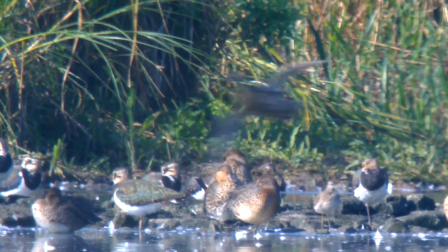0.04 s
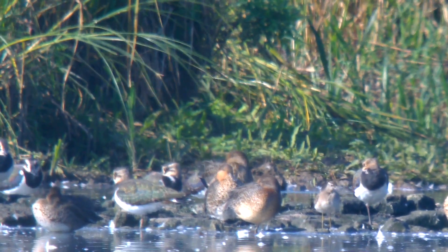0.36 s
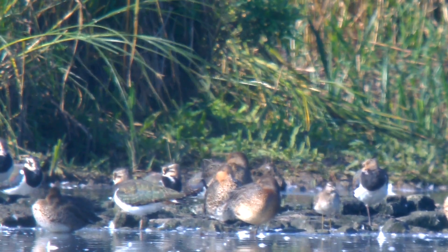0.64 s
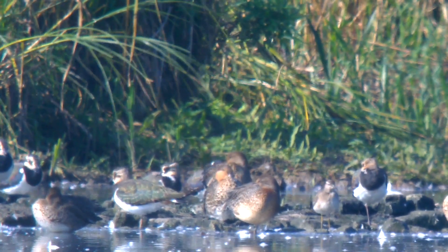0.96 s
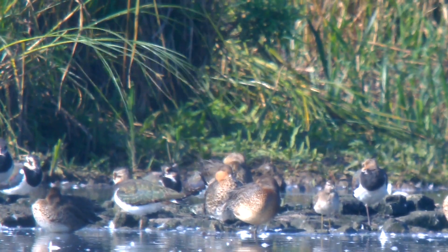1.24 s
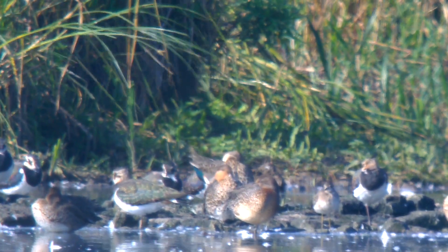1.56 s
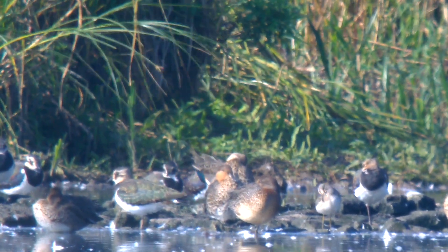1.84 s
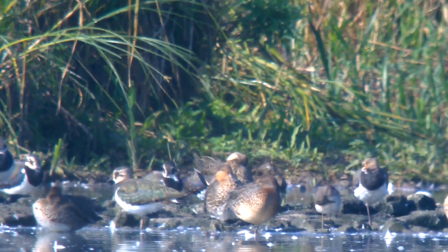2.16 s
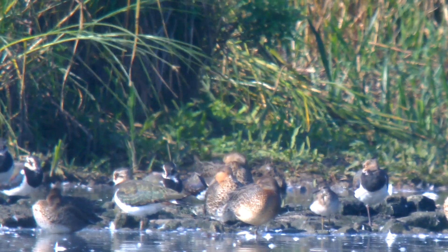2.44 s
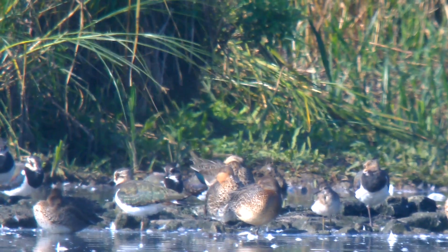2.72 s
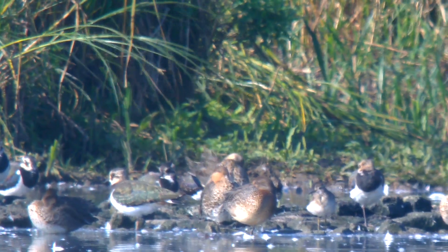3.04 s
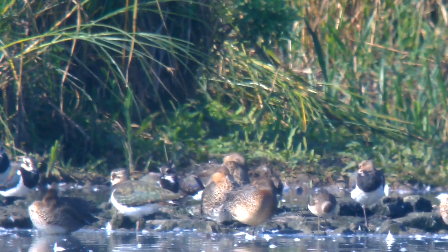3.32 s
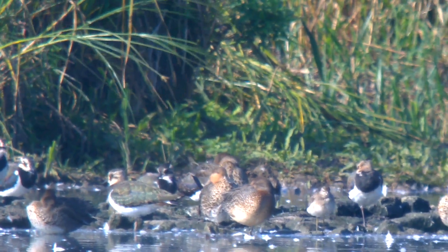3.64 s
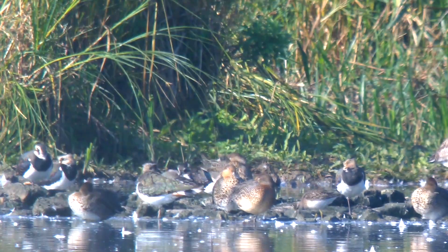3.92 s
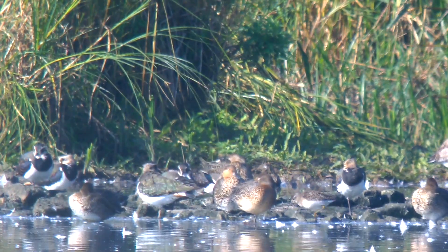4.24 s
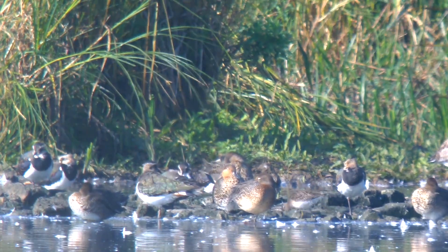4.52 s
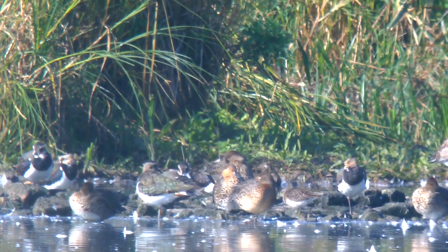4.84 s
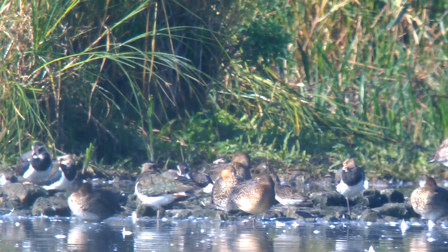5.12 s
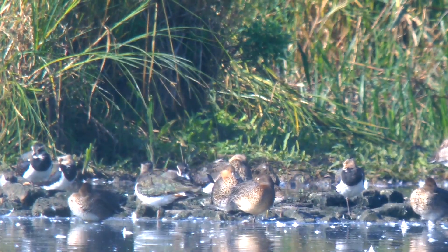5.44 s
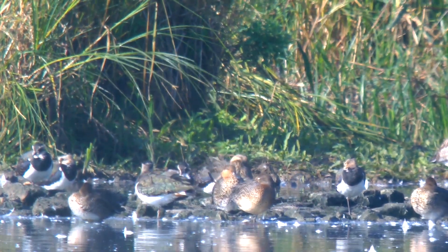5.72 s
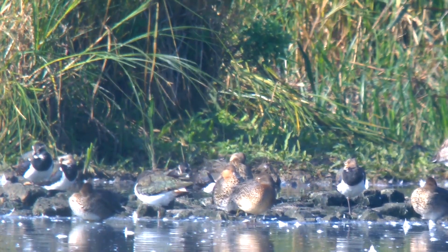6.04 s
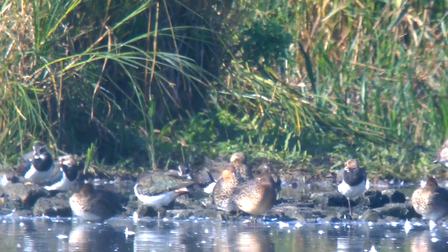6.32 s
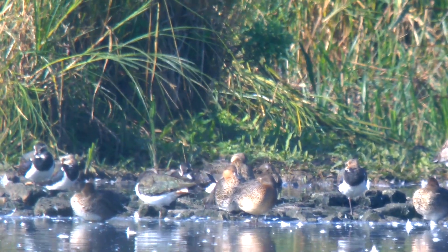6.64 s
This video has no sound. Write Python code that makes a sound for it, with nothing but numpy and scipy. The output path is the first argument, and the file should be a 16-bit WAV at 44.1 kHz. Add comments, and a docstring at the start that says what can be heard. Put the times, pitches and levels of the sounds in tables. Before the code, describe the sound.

Wind thumps on the microphone over a low rumble and softly hissing marsh reeds, with faint distant bird chirps later.

```python
"""Wind at the edge of a marsh

Reeds hiss over a far low rumble and a steady wash of distant wind, with faint hoots.
Gusts thump the microphone, mostly on its left side, while the camera whines and hums faintly.
About halfway a splice clicks; then the hiss drops, the whine throbs and a far small bird chirps."""
import sys
import numpy as np
from scipy import signal
from scipy.fft import rfft, irfft, next_fast_len
from scipy.io import wavfile
from scipy.ndimage import uniform_filter1d, map_coordinates

SR = 44100
rng = np.random.default_rng(int(sys.argv[2]) if len(sys.argv) > 2 else 0)


def persist_wave(psi):
    """Save psi, clipped to +-1, as 16-bit WAV."""
    counts = np.round(np.clip(psi, -1, 1) * 32767).astype(np.int16)
    wavfile.write(sys.argv[1], SR, np.atleast_2d(counts).T)


N = 302967


def amp(db):
    """Turn decibels into a number to multiply by."""
    return 10 ** (np.asarray(db) / 20)


def unit(x):
    """Scale a sound so that its average strength (rms) is 1."""
    return x / np.sqrt(np.mean(x ** 2) + 1e-30)


def clock():
    """The time of every sample, in seconds."""
    return np.arange(N) / SR


def along(points, hz, column=1):
    """Read a table at any frequency, sliding between its rows."""
    cols = np.transpose(points)
    return np.interp(np.log(hz + 1), np.log(cols[0] + 1), cols[column])


def curve(rows):
    """Join (seconds, value) rows with straight lines."""
    return np.interp(clock(), *np.transpose(rows))


def swells(rows, half_s):
    """A level that rises and falls briefly at each (seconds, dB) row."""
    return sum(amp(db) * np.exp(-((clock() - s) / half_s) ** 2) for s, db in rows)


def wobble(rate):
    """A smooth curve through `rate` random values a second."""
    return map_coordinates(rng.standard_normal(int(N * rate / SR) + 4), [clock() * rate])


def filtered(x, response):
    """Turn each frequency up or down by the gain response(hz)."""
    size = next_fast_len(N + SR // 2)
    return irfft(rfft(x, size) * response(np.fft.rfftfreq(size, 1 / SR)), size)[..., :N]


def narrow(x, centre_hz, width_hz):
    """Keep one narrow band, which turns noise into a wavering tone."""
    return unit(filtered(x, lambda hz: 1 / (1 + (2 * (hz - centre_hz) / width_hz) ** 2)))


def noise(colour):
    """Noise whose mix of low and high follows (Hz, dB) rows."""
    return unit(filtered(rng.standard_normal(N), lambda hz: amp(along(colour, hz))))


def evened(x, span_s):
    """Flatten the chance swells of a noise."""
    power = uniform_filter1d(np.abs(signal.hilbert(x)) ** 2, max(int(span_s * SR), 1))
    return unit(x / np.sqrt(np.abs(power) + 1e-6))


def patchy_pair(alike, patchy_db):
    """Stereo noise with drifting loud and soft patches; `alike` sets how well the sides match."""
    spectrum = signal.stft(rng.standard_normal((2, N)), nperseg=512)[2]
    patches = uniform_filter1d(rng.standard_normal(spectrum.shape[1:]), size=5, axis=0)
    patches = uniform_filter1d(patches, size=18, axis=1)
    pair = signal.istft(spectrum * amp(patchy_db * unit(patches)), nperseg=512)[1][:, :N]
    turn = lambda hz: np.arccos(np.clip(along(alike, hz), -1, 1)) / 2
    shared, opposed = filtered(pair, lambda hz: np.array([np.cos(turn(hz)), np.sin(turn(hz))]))
    return np.array([shared + opposed, shared - opposed])


# How the rumble rises and falls. Each row: time in seconds, relative level in dB.
RUMBLE_LEVELS = [(.06, -42), (.25, -52), (.35, -43.5), (.47, -43.5), (.56, -42.5), (.75, -48.5),
                 (.82, -43.5), (.86, -54.5), (.91, -47), (.99, -44.5), (1.04, -49.5), (1.15, -39.5),
                 (1.28, -51.5), (1.36, -44), (1.6, -47), (2.0, -43.5), (2.3, -43), (3.7, -49), (3.82, -50),
                 (4.85, -45), (5.0, -47), (5.08, -44.5), (5.55, -44), (5.68, -46.5), (6.08, -45.5),
                 (6.17, -51.5), (6.25, -47), (6.6, -50), (6.87, -47)]
# The rumble's tone. Each row: frequency in Hz, relative strength in dB.
RUMBLE_COLOUR = [(10, -28), (20, -13), (31, 2.5), (42, -4.5), (58, -.5), (76, -11.5), (95, -11.5),
                 (115, -20), (160, -23.5), (240, -35.5), (500, -61), (1500, -100)]

def rumble():
    """A far low rumble flutters, in step on both sides and stronger on the left."""
    db = curve(RUMBLE_LEVELS) + 1.5 * wobble(rate=11)
    return amp(db) * evened(noise(RUMBLE_COLOUR), span_s=0.093) * amp([[5.3], [-.5]])


def drone():
    """A low far drone grows steadily, heard only at the very end."""
    rise_db_per_s = 18
    db = -54.5 - rise_db_per_s * (N / SR - clock())
    tone = narrow(rng.standard_normal(N), centre_hz=129, width_hz=80)
    return amp(db) * tone * amp([[2.5], [-3]])


# How loud the distant wind is. Each row: time in seconds, relative level in dB.
WASH_LEVELS = [(0, -60.5), (.8, -60), (.86, -60.5), (.95, -59), (1.25, -58.5), (1.45, -58), (1.62, -58.5),
               (1.9, -60.5), (2.3, -59), (3.15, -60.5), (3.4, -59.5), (3.7, -60.3), (3.82, -62.5),
               (4.45, -60.5), (4.75, -61.5), (4.87, -61), (5.1, -60), (5.6, -61.5), (5.82, -60.5),
               (6.3, -61.5), (6.58, -59.5), (6.87, -61.5)]
# Its tone. Each row: frequency in Hz, relative strength on the left and on the right in dB.
WASH_COLOUR = [(131, 7, 2.5), (220, 0, -7.5), (378, -1.5, -7.5), (538, -2.5, -11.5), (844, -1.5, -8),
               (1100, -4.5, -9), (1196, -5.5, -14), (1493, -15.5, -20), (1850, -16, -27.5),
               (2060, -16, -26), (2150, -11, -28), (2400, -11, -28.5), (2860, -19, -37), (3140, -17, -41),
               (3890, -26.5, -55), (6000, -35.5, -41), (10200, -43.5, -53)]
# How its two sides match. Each row: frequency in Hz, likeness from 1 (same) to -1 (opposite).
WASH_ALIKE = [(200, 0.92), (350, 0.93), (520, 0.24), (760, 0.41), (880, -0.35), (1080, -0.62),
              (1400, -0.075), (1900, -0.19), (3200, 0.087), (6000, -0.0043)]

def wash():
    """Distant wind over open ground blends into a murmur."""
    sides = lambda hz: amp([along(WASH_COLOUR, hz, column=1), along(WASH_COLOUR, hz, column=2)])
    low_cut = lambda hz: hz ** 2 / (hz ** 2 + 90 ** 2)
    air = filtered(patchy_pair(WASH_ALIKE, patchy_db=1.13), lambda hz: sides(hz) * low_cut(hz))
    return amp(curve(WASH_LEVELS) + 6.0) * unit(air)


# Thin hums. Each row: start in seconds, pitch in Hz, width in Hz, left level in dB,
# right level in dB, likeness of the two sides.
HUMS = [(-0.5, 895, 20, -73, -71, -0.67), (-1, 389, 14, -71, -81, 0.99), (3, 334, 18, -65.5, -77.5, 0.48),
        (0, 6660, 400, -91, -89, 0.047)]

def hums():
    """Faint steady hums waver; the one near 895 Hz comes from the camera."""
    out = np.zeros((2, N))
    for start, centre_hz, width_hz, left_db, right_db, alike in HUMS:
        tone = narrow(patchy_pair([(1000, alike)], patchy_db=-3.5), centre_hz, width_hz)
        out += tone * amp([[left_db], [right_db]]) * (clock() >= start)
    return out


# Short hoots. Each row: time of the peak in seconds, level on the right in dB.
HOOTS = [(.35, -66), (.99, -63), (1.75, -57), (2.82, -66), (3.37, -66), (5.08, -55), (5.35, -65),
         (5.84, -58), (6.64, -64)]

def hoots():
    """One faint tone swells into brief hoots, the two sides moving against each other."""
    tone = evened(narrow(rng.standard_normal(N), centre_hz=897, width_hz=27), span_s=0.045)
    return swells(HOOTS, half_s=0.039) * tone * np.array([[-amp(-7)], [1]])


# How loud the reeds are. Each row: time in seconds, relative level in dB.
REED_LEVELS = [(0.0, -76), (1.22, -76), (2.6, -73.5), (3.52, -73.5), (3.92, -77), (5.85, -77.5),
               (6.87, -77)]
# Their tone. Each row: frequency in Hz, relative strength in dB.
REED_COLOUR = [(500, -19), (2000, 2), (3500, -1.5), (5300, -0.5), (6700, -3), (8000, -6.5), (11000, -9),
               (15500, -15.5)]

def reeds():
    """Reeds hiss with small dry ticks; a faint electrical buzz from the camera roughens the treble."""
    ticks_per_s, buzz_hz, buzz_db = 150, 50, 3.2
    hiss = unit(patchy_pair([(1000, -0.063)], patchy_db=1.1))
    ticks = unit(rng.standard_normal((2, N)) * (rng.random((2, N)) < ticks_per_s / SR))
    phase = 2 * np.pi * buzz_hz * (clock() - .0133)
    camera_buzz = amp(buzz_db * ((1 + np.cos(phase)) / 2) ** 6)
    rustle = filtered(hiss * camera_buzz + 0.14 * ticks, lambda hz: amp(along(REED_COLOUR, hz)))
    return amp(curve(REED_LEVELS) + 5.5) * unit(rustle)


def whistle(shape, pitch, rasp, tilt_db=0):
    """One gliding note; rasp shakes its pitch, and tilt_db makes it louder per octave up."""
    t = np.arange(SR // 10) / SR - 1 / 20
    s, hz, db = np.transpose(shape)
    jitter = 1 + rasp * wobble(rate=700)[:len(t)]
    phase = 2 * np.pi * np.cumsum(pitch * jitter * np.interp(t, s, hz)) / SR
    db = db + tilt_db * np.log2(hz / hz.mean())
    return np.sqrt(2) * np.sin(phase) * amp(np.interp(t, s, db, left=-120, right=-120))


def reed_echo(call, fade_s):
    """The reed bed scatters a call, adding a blurred echo that drops 60 dB in fade_s."""
    t = np.arange(SR // 3) / SR
    tail = rng.standard_normal((2, len(t))) * amp(-60 * t / fade_s)
    return call + signal.fftconvolve(call[None], tail / np.linalg.norm(tail[0]), axes=1)[:, :N]


# The chirps. Each row: time in seconds, relative level in dB, brightness in dB per octave.
CHIRPS = [(3.79, -75, 0), (3.953, -74, 6), (4.324, -76, 0), (4.495, -74, 3), (4.672, -71, 3),
          (5.053, -73.5, 3), (5.225, -74.5, 5), (5.626, -65.5, -6), (5.82, -71.5, 5), (5.909, -78, 0),
          (6.472, -71, 3), (6.641, -72, 3)]
# A chirp's two voices, and one thin high note.
# Each row: seconds from the note's middle, base pitch in Hz, relative level in dB.
RISING_VOICE = [(-.03, 3265, -16), (-.015, 3550, -2), (-.003, 4030, 1.5), (.006, 4530, -1),
                (.014, 4880, -1), (.022, 5100, -29)]
FALLING_VOICE = [(-.002, 4150, -24), (.005, 3796, -3.5), (.014, 3400, 0), (.022, 3240, -26)]
THIN_NOTE = [(-.028, 7000, -18), (-.012, 6850, 1), (.002, 6650, -1), (.014, 6800, 1), (.026, 6700, -20)]

def birds():
    """A small bird far to the left repeats a raspy two-voiced chirp; another gives one thin note."""
    rasp, thin_note_at_s = .025, 5.478
    song = np.zeros(N + SR)
    pitches = 1 + 0.0198 * rng.standard_normal(len(CHIRPS))
    for (s, db, tilt_db), pitch in zip(CHIRPS, pitches):
        rising = whistle(RISING_VOICE, pitch, rasp, tilt_db)
        falling = whistle(FALLING_VOICE, pitch, 2 * rasp) * amp(-tilt_db / 2)
        song[round(s * SR) - SR // 20:][:len(rising)] += amp(db) * (rising + falling)
    thin = whistle(THIN_NOTE, pitch=0.99, rasp=rasp / 2)
    song[round(thin_note_at_s * SR) - SR // 20:][:len(thin)] += amp(-75.5) * thin
    rough = song[:N] * (1 + .6 * wobble(rate=900))
    return reed_echo(rough, fade_s=.13) * amp([[-3.5], [-14.5]])


CLICK_AT_S = 3.751

def click():
    """A splice in the sound makes one dry click, mostly on the left."""
    age = clock() - CLICK_AT_S
    return (age >= 0) * np.exp(-np.abs(age) / 0.002) * amp([[-26], [-38]])


# How loud the camera's whine is. Each row: time in seconds, relative level in dB.
WHINE_LEVELS = [(0, -73), (.08, -66), (.15, -71), (.24, -81), (.32, -68), (.65, -67), (1.23, -68),
                (1.3, -73), (1.4, -69.5), (1.65, -66.5), (1.95, -68.5), (2.08, -65.5), (2.38, -69),
                (2.55, -62), (2.75, -64), (2.97, -77), (3.07, -60.5), (3.16, -73), (3.27, -65.5),
                (3.38, -70), (3.73, -65), (3.79, -84), (4.11, -74), (4.45, -83), (4.69, -76), (4.88, -74),
                (5.07, -78), (5.3, -76), (5.9, -75), (6.6, -72.5), (6.8, -71.5)]
# Its two tones after the click. Each row: pitch in Hz, width in Hz.
WHINE_PAIR = [(1945, 27), (2003, 30)]

def whine():
    """The camera whines thinly; after the click its tone splits into two weaker ones that throb."""
    flutter_db, throb_db, throb_period_s, throb_peak_at_s = 2.14, 4.5, .192, 4.115
    tone = lambda centre_hz, width_hz: narrow(rng.standard_normal(N), centre_hz, width_hz)
    double = unit(sum(tone(*row) for row in WHINE_PAIR))
    after_click = clock() >= CLICK_AT_S
    throb = after_click * np.cos(2 * np.pi * (clock() - throb_peak_at_s) / throb_period_s)
    db = curve(WHINE_LEVELS) + flutter_db * wobble(rate=18) + throb_db * throb
    single = tone(centre_hz=1969, width_hz=27)
    voice = amp(db) * evened(np.where(after_click, double, single), span_s=0.04)
    return voice * np.array([[amp(3.5)], [-amp(-8.5)]])  # the two sides move against each other


# Puffs of air. Each row: time of the peak in seconds, level on the left in dB.
PUFFS = [(4.07, -53), (4.23, -55.5), (4.42, -54), (4.6, -55.5)]
# Their tone. Each row: frequency in Hz, relative strength in dB.
PUFF_COLOUR = [(200, -8), (450, 0.5), (620, 2), (900, -6), (1400, -20), (3000, -54)]

def puffs():
    """Soft puffs of air rush past, mostly on the left, during the last strong gusts."""
    air = np.array([noise(PUFF_COLOUR), noise(PUFF_COLOUR)])
    return swells(PUFFS, half_s=0.06) * air * amp([[0], [-10]])


# Gusts on the microphone. Each row: start and length in seconds, left and right level in dB.
GUSTS = [(1.829, 0.062, -37, -46), (2.088, 0.053, -32.5, -38), (2.294, 0.067, -30.5, -39.5),
         (2.475, .22, -29, -36.5), (2.789, 0.083, -30.5, -46), (2.891, .07, -29.5, -29),
         (3.024, 0.29, -37, -52), (3.354, .04, -53, -35.5), (3.443, 0.16, -22, -35.5),
         (3.665, 0.08, -26.5, -33.5), (3.986, 0.13, -28.5, -54), (4.177, 0.17, -27.5, -56),
         (4.38, 0.29, -29, -49), (4.864, 0.026, -33.5, -46), (5.172, 0.15, -33, -53),
         (5.487, 0.07, -50, -39), (5.76, 0.144, -37.5, -61)]

def gust_levels():
    """Wind level in dB per side: gusts build, hold and fade over a breeze that follows the rumble."""
    rise_s, fall_s = 0.029, 0.024
    t = clock()
    breeze = amp([[-4], [-7.5]]) * amp(curve(RUMBLE_LEVELS))
    power = breeze ** 2
    for start, length, left_db, right_db in GUSTS:
        before = np.maximum(start - t, 0) / rise_s
        after = np.maximum(t - start - length, 0) / fall_s
        shape = np.exp(-np.minimum(before + after, 20))
        power += (amp([[left_db], [right_db]]) * shape) ** 2
    return 10 * np.log10(power)


STRONG_WIND_DB = -31  # above this the wind sounds fuller and carries small swirls
# The tone of wind on the microphone. Each row: frequency in Hz, relative strength in dB.
BUFFET_COLOUR = [(8, -10), (18, -4), (32, 1), (55, -2.5), (80, -9), (110, -12.5), (170, -21.5), (260, -35),
                 (500, -45), (1500, -100)]

def buffet(level_db, soft_hz):
    """Churning air thumps one side of the microphone; a weak breeze is muffled above soft_hz."""
    db = level_db + wobble(rate=12)  # swings by about 1 dB
    strong = evened(noise(BUFFET_COLOUR), span_s=0.07)
    weak = unit(filtered(strong, lambda hz: 1 / np.sqrt(1 + (hz / soft_hz) ** 6)))
    force = np.clip((db - STRONG_WIND_DB) / 11, 0, 1)
    return amp(db) * (force * strong + (1 - force) * weak)


def small_eddies(level_db, per_s=10, half_s=0.0019):
    """Rows for small chance swirls of air, stronger when the gust that carries them is stronger."""
    at = np.flatnonzero((rng.random(N) < per_s / SR) & (level_db > STRONG_WIND_DB))
    return [(i / SR, level_db[i] - 5, half_s) for i in at]


# The hardest swirls of air. Each row: time in seconds, relative level in dB, half-length in seconds.
BIG_EDDIES = [(.055, -27.5, 0.0096), (.35, -26.5, 0.0086), (.55, -28.5, .0055), (.99, -28, 0.0054),
              (1.41, -29.5, 0.0075), (1.705, -26, 0.0061), (1.84, -26.5, 0.0078), (2.088, -18, 0.0061),
              (2.115, -23, 0.0064), (2.325, -21, 0.0057), (2.376, -17.5, 0.0064), (2.66, -24.5, 0.003),
              (2.678, -16.5, 0.0043), (2.787, -19.5, 0.006), (2.827, -17.5, 0.0042), (2.92, -22, 0.004),
              (3.451, -16, 0.0053), (3.464, -20.5, 0.0025), (3.514, -17.5, 0.0058), (3.531, -15, 0.0032),
              (3.539, -25.5, 0.0013), (3.578, -26.5, 0.0015), (3.592, -10, 0.0042), (3.659, -24, 0.0024),
              (3.677, -16, 0.0059), (4.0, -23, 0.003), (4.059, -16.5, 0.0061), (4.093, -20, 0.0039),
              (4.204, -15, 0.0037), (4.222, -21.5, 0.0077), (4.25, -24, .0025), (4.326, -20, 0.0026),
              (4.34, -18, 0.0043), (4.392, -19.5, 0.0029), (4.449, -18, .0024), (4.471, -23, 0.0024),
              (4.6, -23.5, 0.0038), (4.65, -25.5, 0.0039), (4.697, -24.5, 0.0034), (4.885, -22.5, 0.0048),
              (5.197, -23, 0.0034), (5.295, -23.5, 0.0042), (5.525, -25.5, 0.0068), (5.812, -25.5, 0.0048),
              (5.885, -25.5, 0.0071)]

def eddies(wind_db):
    """Each swirl knocks on the left, pushing the pressure one way and back; short ones sound higher."""
    rows = BIG_EDDIES + small_eddies(wind_db)
    signs = np.sign(rng.standard_normal(len(rows)))
    out, t = np.zeros(N), clock()
    for (s, db, half_s), sign in zip(rows, signs):
        centre = round(s * SR)
        near = slice(max(centre - SR // 20, 0), centre + SR // 20)
        passing = (t[near] - s) / half_s
        out[near] += amp(db) * sign * passing / np.cosh(passing) ** 2
    return out * amp([[7], [-18]])


def scene():
    """Add up the background, the whine, the click and the wind on the microphone."""
    left_db, right_db = gust_levels()
    wind = np.array([buffet(left_db, soft_hz=88), buffet(right_db, soft_hz=97)]) + puffs()
    background = rumble() + drone() + wash() + reeds() + hums() + birds() + hoots()
    return background + whine() + click() + wind + eddies(left_db)


def record(dry):
    """The camera cuts off the very highest treble."""
    return filtered(dry, lambda hz: hz < 15750)


dry = scene()
out = record(dry)
persist_wave(out)
```